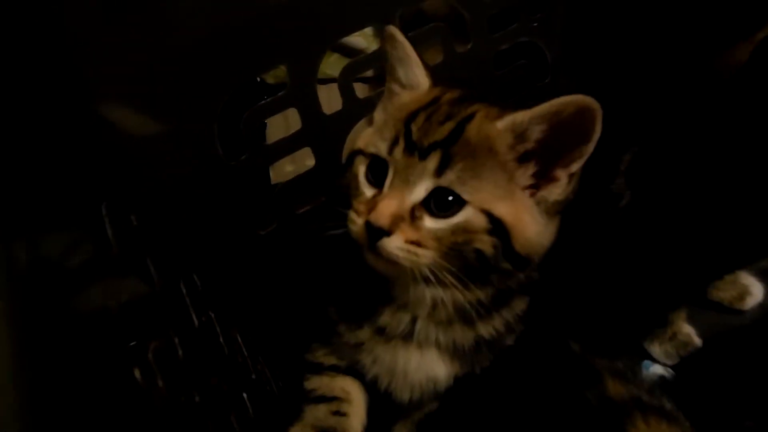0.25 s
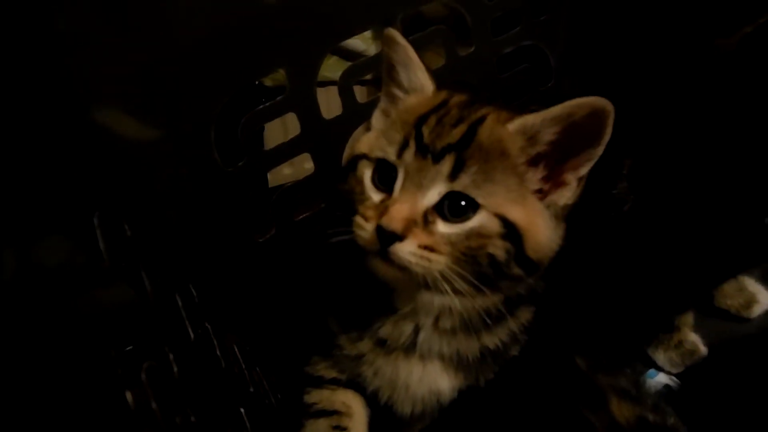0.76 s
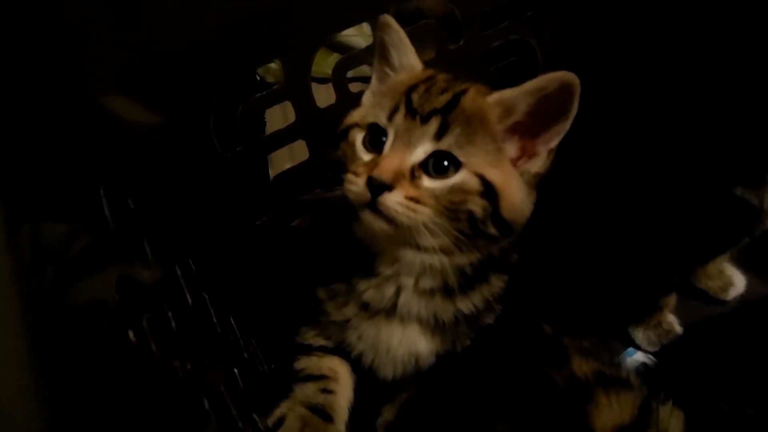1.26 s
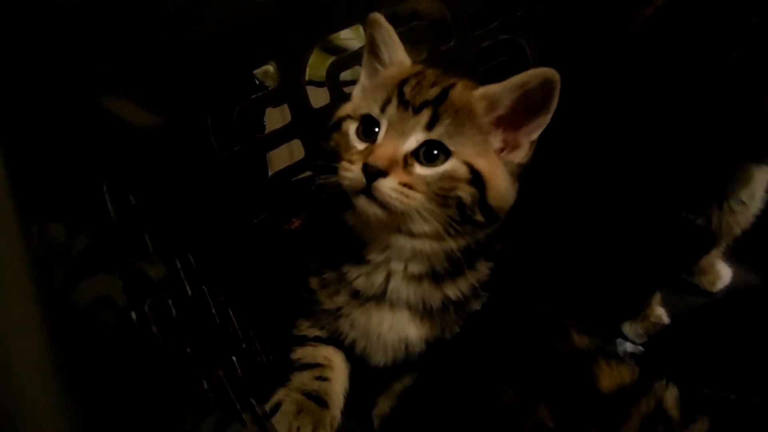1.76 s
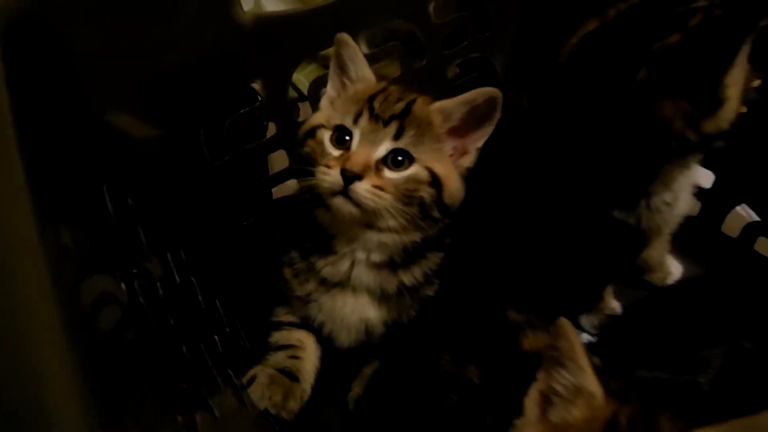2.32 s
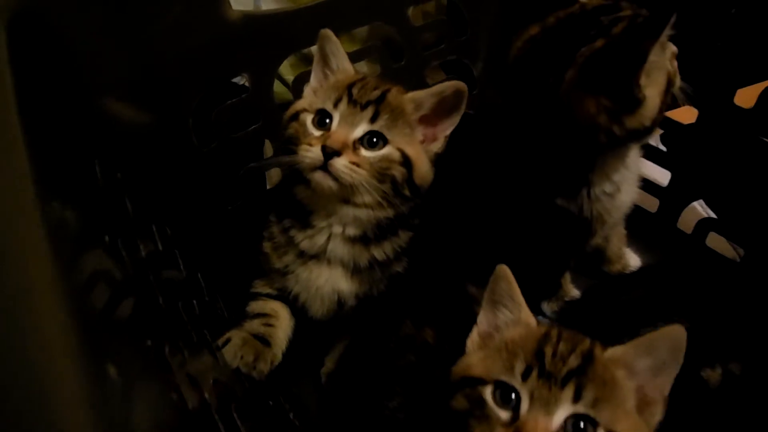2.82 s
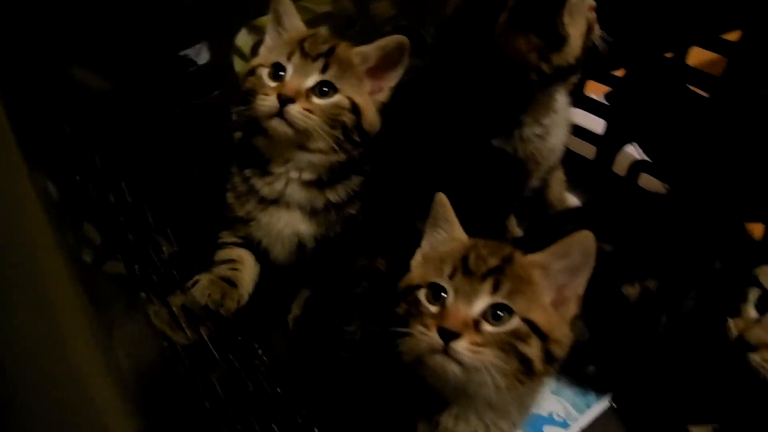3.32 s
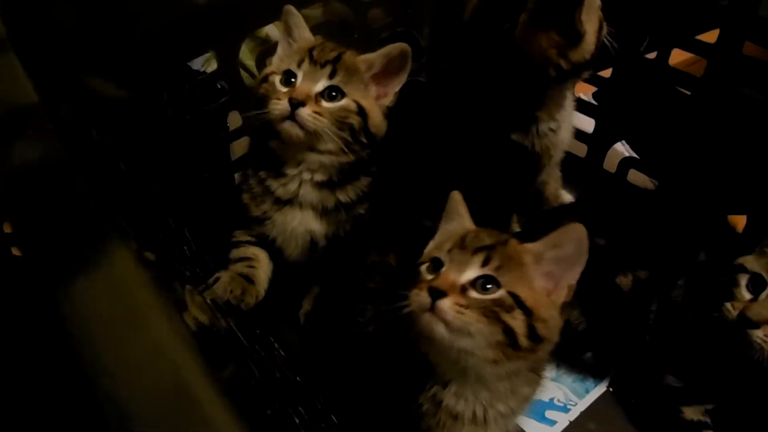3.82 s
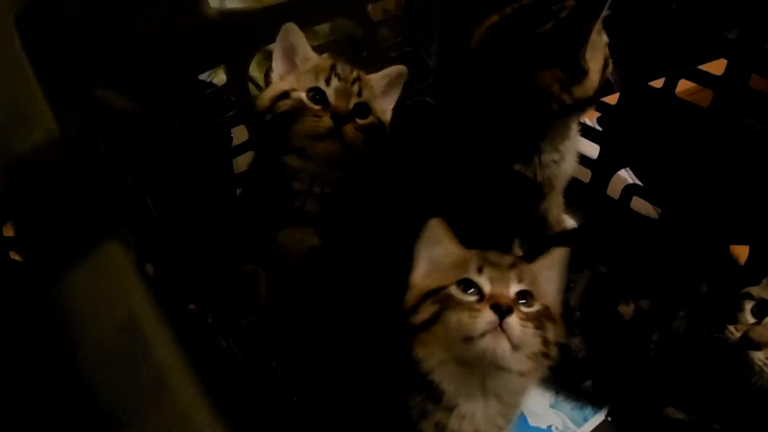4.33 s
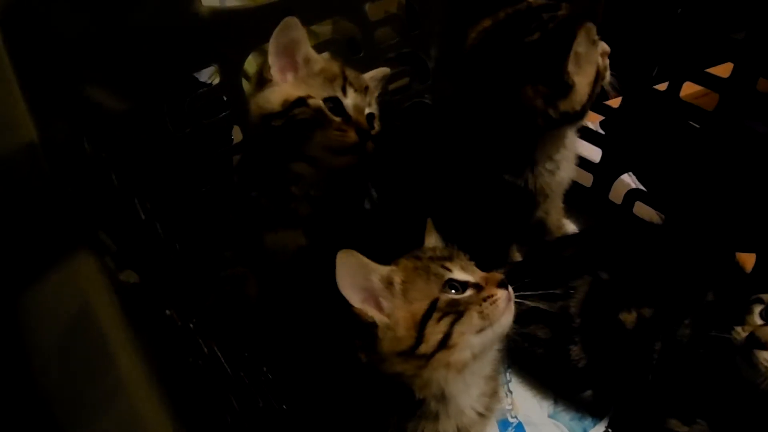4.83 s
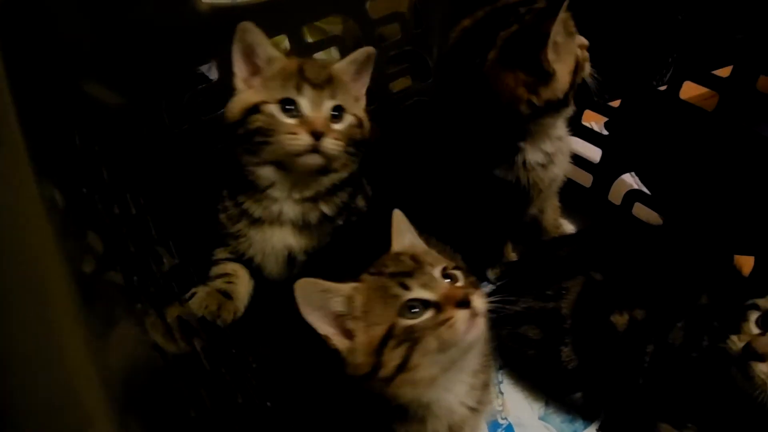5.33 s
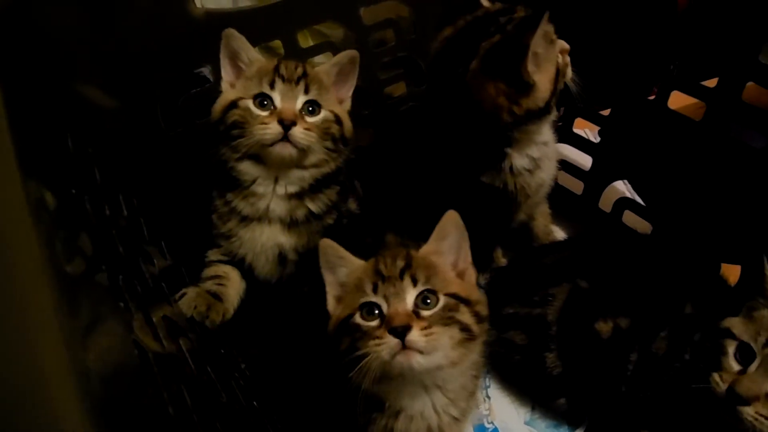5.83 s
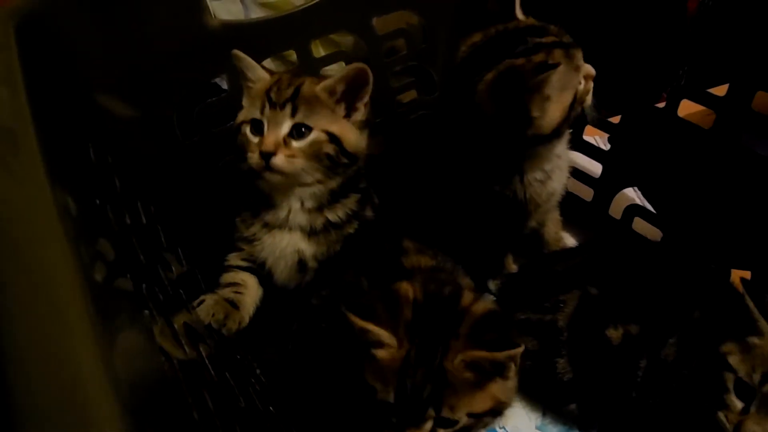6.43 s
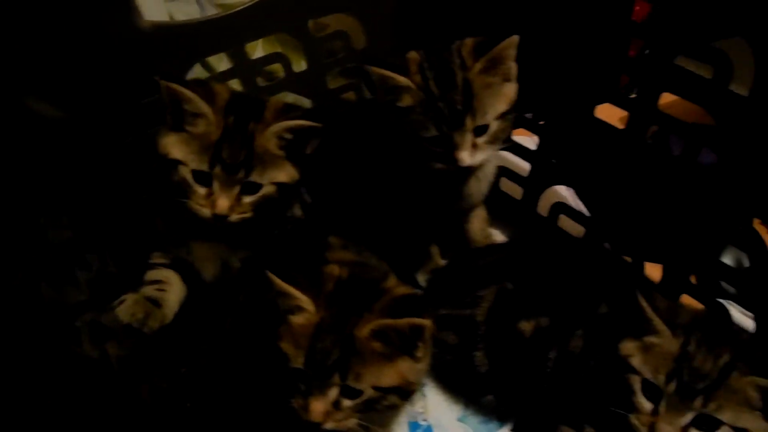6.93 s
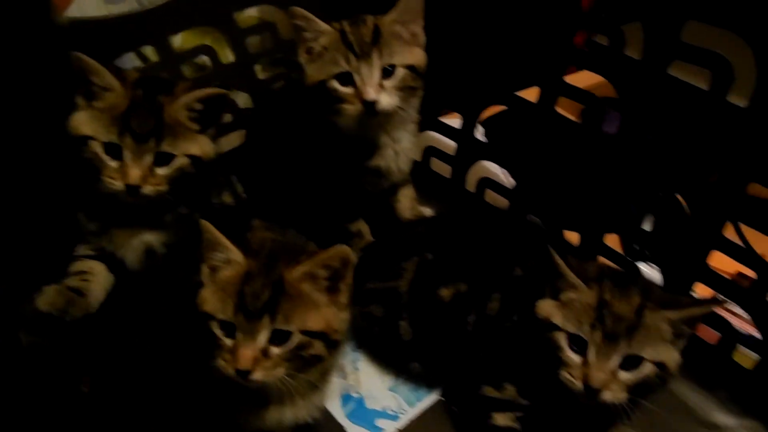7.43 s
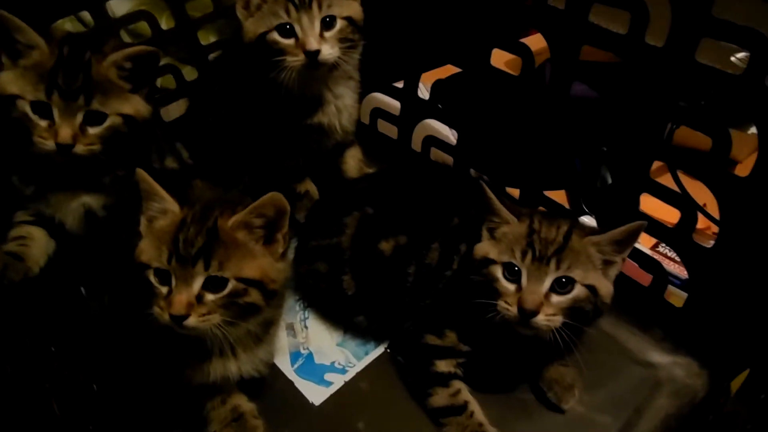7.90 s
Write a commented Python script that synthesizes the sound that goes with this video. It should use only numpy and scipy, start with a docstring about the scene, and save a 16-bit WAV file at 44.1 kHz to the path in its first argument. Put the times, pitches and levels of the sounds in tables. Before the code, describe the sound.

A quiet small room with faint low hum and soft hiss, heard close in stereo. Barely audible claw rubs begin at 0.1 s. From about 0.65 s kitten claws scrape and snap on a ribbed plastic basket: dry, gritty strokes of a few hundredths of a second, ending in bright clicks with a very brief ring. They come in irregular clusters, with a sharp snap near 2.0, strong rasping scratches at 2.6-2.8, smaller ticks from 3.0, and the hardest snaps at 3.76 and 3.91. Faint paw thuds lie under some. From 4 to 5.5 s it is almost silent. A short scratch burst comes at 5.6-5.85. Between 6.3 and 6.85 a run of dull, low knocks and soft rubs bumps the wall, strongest at 6.35. Quiet returns until a few lighter scratches and clicks at 7.8-8.15.

```python
"""Gritty scratches, sharp snaps with a brief ring, then late on a run of dull knocks, over faint hum and hiss.
Kittens scrabble in a plastic laundry basket in a quiet, small room, close to a stereo pair of ports.
Claws are stick-slip impulse trains and single slips, shaped by the spectrum of the plastic and ringing rib modes.
Knocks are softer slips with wall modes; paw thuds are damped sines; the room tone is shaped noise with two hum tones."""
import sys
import numpy as np
from scipy import signal
from scipy.fft import rfft, irfft
from scipy.io import wavfile
from scipy.ndimage import uniform_filter1d

SR = 44100
rng = np.random.default_rng(int(sys.argv[2]) if len(sys.argv) > 2 else 0)


def wav_record(signal):
    """Record a signal, one row per channel, as 16-bit PCM in the file named by sys.argv[1]."""
    frames = np.transpose(np.atleast_2d(signal))
    bounded = np.clip(frames, -1, 1)
    # unit amplitude maps onto the largest positive 16-bit level
    quanta = np.round(bounded * 32767).astype(np.int16)
    wavfile.write(sys.argv[1], SR, quanta)


N = 359856

# share of the wall flex at each pitch: (frequency [Hz], share)
FLEX_SHARE = [(1400, 1), (2500, 0)]
EDGE_HZ = 16000  # upper band limit
TAPS = 2048  # length of the contact forces and filters
HZ = np.fft.rfftfreq(TAPS, 1 / SR)
LEAD_S = .004  # a slip lets go this long after its buffer starts
RMS_1MS = np.sqrt(SR / 1000)  # turns energy 1 into rms 1 over 1 ms


def amp(db):
    """Amplitude ratio of a level in dB."""
    return 10 ** (np.asarray(db) / 20)


def unit(x):
    """Scales to rms 1."""
    return x / np.sqrt(np.mean(x ** 2) + 1e-20)


def read(points, hz):
    """Joins table rows by straight lines on a log-frequency axis."""
    f, value = np.transpose(points)
    return np.interp(np.log(hz + 1), np.log(f + 1), value)


def wander(count, size):
    """Smoothed noise of rms 1."""
    once = uniform_filter1d(rng.standard_normal(count), size)
    return unit(uniform_filter1d(once, size))


def add(mix, s, sound):
    """Adds a sound to the mix at time s, cut at the end of the mix."""
    part = mix[:, round(s * SR):][:, :sound.shape[1]]
    part += sound[:, :part.shape[1]]


def snaps(wet_db=-9.5, ring_db=-3.0, chatter=.18):
    """Claw tips flick off the ribs: a wall that gives also rings, and a long slip is sharp."""
    # claw letting go of a rib: (time [s], rms level over 1 ms [dB], slip length [s], give of the wall [dB])
    snap_events = [(.665, -36, 0.0012, 14), (.722, -27.5, 0.0012, 5), (0.858, -16, 0.00052, 7.5),
                   (.914, -11, 0.0012, -7), (1.103, -15.5, 0.00091, 11.5), (1.131, -13, 0.00058, 8),
                   (1.156, -19.5, 0.00093, -8), (1.194, -29.5, 0.0018, -1), (1.384, -26, 0.0006, 7),
                   (1.444, -13, 0.00068, 2.5), (1.525, -16, 0.001, 10.5), (1.586, -26.5, 0.0018, 12),
                   (1.631, -18.5, 0.0015, 14.5), (1.699, -22.5, 0.00041, 11), (1.854, -20, 0.00055, 12),
                   (1.9582, -14.5, .001, 3), (1.966, -14.5, 0.00031, -0.5), (1.984, -6, 0.00081, 4.5),
                   (1.998, -14, 0.001, -3), (2.059, -21, 0.0026, 19), (2.122, -17, 0.0022, 12),
                   (2.13, -17, 0.00025, 4.5), (2.1442, -13.5, 0.00065, 12), (2.287, -15.5, 0.0023, 11),
                   (2.344, -33, 0.0012, 13), (2.445, -34.5, 0.0011, 26), (2.611, -9, 0.0014, 15.5),
                   (2.649, -13, .0011, 8), (2.753, -9, 0.00089, 3.5), (2.779, -6, 0.0032, 2.5),
                   (2.920, -8.5, 0.0017, 2), (2.951, -12.5, 0.00089, 1.5), (3.024, -28, 0.0013, 18.5),
                   (3.055, -38.5, 0.0008, 19), (3.1315, -25.5, 0.0013, 10), (3.151, -15, .0014, 15.5),
                   (3.166, -18.5, 0.00032, 0), (3.178, -10.5, 0.00069, 1), (3.257, -24.5, 0.00082, 16.5),
                   (3.341, -18.5, 0.0017, 6), (3.377, -28.5, .0013, 13.5), (3.419, -35.5, 0.0044, 27),
                   (3.459, -19, 0.0023, 7), (3.472, -33, 0.0013, 7), (3.509, -14.5, 0.0029, 5),
                   (3.610, -22, .0012, 8.5), (3.625, -21, 0.0035, 12.5), (3.711, -12.5, 0.0004, -3),
                   (3.7606, 0.5, 0.0016, -3.5), (3.774, -7, 0.0015, 0.5), (3.880, -9, 0.0027, 4.5),
                   (3.910, -1.5, 0.0027, 3.5), (5.613, -18, 0.00081, 6), (5.697, -32.5, 0.0024, 18),
                   (5.765, -17, 0.0019, 6.5), (5.832, -6.5, 0.0019, 2.5), (7.787, -36, 0.0015, 20.5),
                   (7.926, -13, .0005, 0), (7.979, -14, .001, 8.5), (8.110, -17.5, 0.0026, 9.5),
                   (8.1382, -17, .0026, -8)]
    # relative contact spectrum: (frequency [Hz], density [dB])
    base = [(60, -28), (200, -26), (600, -18), (1200, -20), (2000, -12), (3100, -8.5), (4200, -6),
            (5700, -4.5), (7700, 6.5), (9300, 0.5), (11000, -7.5), (15500, -11.5)]
    usual_slip_s, sharp_db_per_octave, lumps_db = 0.00088, 4, 2
    out = np.zeros((2, N))
    for s, db, length_s, give_db in snap_events:
        spot_db, rib_hz = spot_at(s)
        sharp_db = spot_db + sharp_db_per_octave * np.log2(length_s / usual_slip_s)
        colour_db = claw_colour(base, give_db, ring_db + ring_of(give_db), sharp_db, rib_hz)
        # each blow favours some resonances of the plastic
        colour_db = colour_db + lumps_db * wander(len(HZ), size=36)
        direct_and_wet = radiate(slip(length_s, chatter), colour_db, *place(s), wet_db)
        add(out, s - LEAD_S, amp(db) * RMS_1MS * rib_ring(direct_and_wet))
    return out


def scrapes(strokes, swell_db, flex_db, ring_db, sharp_db, wet_db, slips_per_s, uneven_db):
    """Claws drag along the wall in gritty strokes; the lighter the stroke, the more wall and rib sound."""
    # relative contact spectrum: (frequency [Hz], density [dB])
    base = [(60, -22), (250, -24), (700, -17), (1300, -20), (2100, -13), (3050, -8.5), (4100, -5.5),
            (5700, -4.5), (7600, 6.5), (9300, -1), (11500, -1.5), (15500, -13)]
    usual_stroke_db, give_per_db = -39, -0.1145
    out = np.zeros((2, N))
    for start_s, length_s, db in strokes:
        force, size = drag(length_s, db, swell_db, slips_per_s, uneven_db)
        spot_db, rib_hz = spot_at(start_s)
        give_db = give_per_db * (db - usual_stroke_db)
        colour_db = claw_colour(base, flex_db + give_db, ring_db + ring_of(give_db),
                                sharp_db + spot_db, rib_hz, rib_db=7.0)
        sound = rib_ring(radiate(force, colour_db, *place(start_s), wet_db))
        add(out, start_s, size * sound)
    return out


def slip(length_s, chatter, lead_in=0.289, ride_s=0.00021):
    """The contact rides up, lets go at once, and dies in a chatter of tiny slips."""
    t = np.arange(TAPS) / SR - LEAD_S
    rise = lead_in * np.exp(-abs(t) / ride_s)
    decay = np.exp(-abs(t) / max(length_s, 1e-4))
    uneven = rng.standard_normal(TAPS) * amp(8.2 * rng.standard_normal(TAPS))
    force = chatter * uneven * np.where(t < 0, rise, decay)
    force[round(LEAD_S * SR)] += 1
    z = rfft(force)
    return irfft(z / np.sqrt(abs(z) + 1e-9))  # flattened: so brief a push excites all pitches nearly alike


def drag(length_s, db, swell_db, slips_per_s, uneven_db=2.0, judder_db=2., rise_s=0.0035, release_s=0.0099):
    """Random stick-slip on the grain of the plastic under changing pressure; returns the force and its size."""
    t = np.arange(SR // 4) / SR  # strokes end here at the latest
    length_s = max(length_s, .01)
    pressure = amp(db + swell_db * (np.minimum(t / length_s, 1) - .5))
    pressure *= np.minimum(t / rise_s, 1) * np.exp(-np.maximum(t - length_s, 0) / release_s)
    slips = (rng.random(len(t)) < slips_per_s / SR) * rng.choice([-1, 1], len(t))
    scatter_db = uneven_db * np.clip(rng.standard_normal(len(t)), -2, 2.7)
    size = amp(scatter_db + judder_db * wander(len(t), size=110))
    return slips * size * pressure, np.linalg.norm(pressure)


def spot_at(s):
    """Sharpness [dB] and rib pitch [Hz] under the claw; the pitch scatters from contact to contact."""
    # spot that the paw works on: (time [s], rib pitch [Hz], sharpness [dB])
    spots = [(.72, 2090, -2.5), (.86, 3000, 0.5), (1.65, 2930, -4), (2.1, 3020, -3), (2.68, 3070, 2),
             (2.78, 1560, -0.5), (3.2, 1920, 3), (3.55, 2010, 0.5), (3.77, 2270, 2.5), (3.9, 2956, 2.5),
             (5.62, 3270, -4), (5.82, 1960, 4), (7.95, 3480, -1), (8.11, 1480, 3)]
    times, rib_hz, sharp_db = np.transpose(spots)
    scatter = np.exp(0.066 * rng.standard_normal())
    return np.interp(s, times, sharp_db), np.interp(s, times, rib_hz) * scatter


def place(s):
    """Left-right balance [dB] and lead of the left port [s] for the paw at work at this moment."""
    # paw position: (time [s], left-right balance [dB], lead of the left port [s])
    positions = [(.9, 1, 0.000077), (1.2, 0.5, 0.000061), (1.6, -0.5, 0.000043), (2.6, -1, 0.00005),
                 (3.0, -1.5, 0.000031), (3.8, -2, 2e-5), (5.702, -1.5, 0.000025), (7.93, -1.5, 1e-6)]
    times, balance_db, lead_s = np.transpose(positions)
    return np.interp(s, times, balance_db), np.interp(s, times, lead_s)


def claw_colour(base, flex_db, ring_db, sharp_db, rib_hz, rib_db=8.0):
    """Spectrum [dB] of one spot on the basket, with the broad resonance of the rib under the claw."""
    # share of rib ring at each pitch: (frequency [Hz], share)
    ring_share = [(1400, 0), (2500, 1), (4800, 1), (6800, 0)]
    # share of sharpness at each pitch: (frequency [Hz], share)
    sharp_share = [(9000, 0), (11500, 1)]
    rib = rib_db / (1 + ((HZ / rib_hz - 1) / .12) ** 2)
    wall = flex_db * read(FLEX_SHARE, HZ) + ring_db * read(ring_share, HZ)
    return read(base, HZ) + rib + wall + sharp_db * read(sharp_share, HZ)


def ring_of(give_db):
    """A wall that gives also shakes its ribs, up to a limit; returns dB."""
    return min(0.73 * give_db, 12)


def rib_ring(x):
    """One contact with the rib modes that it wakes, mixed at random for each contact."""
    # modes of the plastic ribs before the mix: (frequency [Hz], level [dB], t60 [s])
    rib_modes = [(1874, -51, 0.043), (2398, -40.5, 0.031), (3010, -58, 0.044), (3124, -49.5, 0.045),
                 (6500, -66, .05), (7200, -83.5, 0.09), (7900, -65, .07), (9480, -39.5, 0.048)]
    mix_db = 3 * np.clip(rng.standard_normal(len(rib_modes)), -2, 1.5)
    mixed = [(hz, db + extra_db, t60_s) for (hz, db, t60_s), extra_db in zip(rib_modes, mix_db)]
    return ringing(x, mixed)


def ringing(x, modes):
    """Lightly damped modes of the plastic sing on after each contact."""
    t = np.arange(SR // 6) / SR
    ring = np.zeros(len(t))
    for hz, db, t60_s in modes:
        ring += amp(db - 60 * t / t60_s) * np.sin(2 * np.pi * (hz * t + rng.random()))
    return x + signal.fftconvolve(x, ring[None], axes=1)[:, :x.shape[1]]


def causal(db):
    """Minimum-phase impulse response of a spectrum in dB."""
    log_gain = np.log(amp(np.concatenate([db, db[-2:0:-1]])))
    return np.fft.ifft(np.exp(np.conj(signal.hilbert(log_gain)))).real


def radiate(force, colour_db, pan_db, lead_s, wet_db):
    """A force sounds through the plastic to two ports, direct (mean energy 1) and by reflection."""
    # difference in port colour: (frequency [Hz], left-right [dB])
    port_balance = [(300, -1), (2000, 0), (4000, 0), (5500, 1), (7500, -1.5), (10000, 0), (12500, 2),
                    (15000, 5)]
    # likeness of the direct sound at the ports: (frequency [Hz], coherence)
    port_likeness = [(300, 1), (1500, 0.64), (4000, 0.7), (9000, 0.6), (15000, 0.23)]
    spot_db = 1.2 * wander(len(HZ), size=22)
    likeness = np.clip(read(port_likeness, HZ), 0, 1)
    phase_spread = np.sqrt(1 - likeness ** 2) * wander(len(HZ), size=40)
    side_db = (read(port_balance, HZ) + pan_db) / 2
    ports = np.array([causal(colour_db + spot_db + side_db), causal(colour_db + spot_db - side_db)])
    source = signal.fftconvolve(force[None], ports[:, :TAPS // 2], axes=1)
    source /= np.sqrt((source ** 2).sum() / 2)
    # the right port hears it a little later, with its phase bent
    count = source.shape[1]
    lag = np.interp(np.fft.rfftfreq(count, 1 / SR), HZ, 2 * np.pi * HZ * lead_s + phase_spread)
    late_right = irfft(rfft(source[1]) * np.exp(-1j * lag), count)
    out = signal.fftconvolve(source, amp(wet_db) * surroundings(), axes=1)
    add(out, 0, np.array([source[0], late_right]))
    return out


def surroundings(basket_db=1.0, room_db=-5.5, build_s=0.0015):
    """Basket echoes and a short room tail, each band dying at its own speed; levels before the wet gain."""
    # likeness of the tail at the ports: (frequency [Hz], coherence)
    room_likeness = [(300, 0.99), (1000, 0.87), (2500, 0.19), (5000, 0.28)]
    # decay of the room: (frequency [Hz], t60 [s])
    room_t60 = [(200, 0.11), (1000, 0.25), (3000, 0.25), (8000, 0.2), (15000, 0.19)]
    noise = irfft(diffuse(room_likeness, SR // 4))
    hz, t, z = signal.stft(noise, SR, nperseg=256)
    decay = amp(-60 * t / read(room_t60, hz)[:, None])
    tail = signal.istft(z * decay, SR, nperseg=256)[1]
    tail *= 1 - np.exp(-(np.arange(tail.shape[1]) / SR / build_s) ** 2)
    tail *= amp(room_db) / np.linalg.norm(tail[0])
    add(tail, 0, amp(basket_db) * basket_echoes())
    return tail


def basket_echoes(first_s=.0016, fade_s=0.0019, count=50):
    """The near walls of the basket throw back a cluster of quick reflections, energy 1 per port."""
    taps = np.zeros((2, TAPS))
    delay_s = np.clip(first_s + 0.026 * rng.random((2, count)), 0, .04)
    echoes = rng.choice([-1, 1], delay_s.shape) * np.exp(-delay_s / fade_s)
    np.put_along_axis(taps, (delay_s * SR).astype(int), echoes, 1)
    return taps / np.linalg.norm(taps, axis=1, keepdims=True)


def diffuse(likeness, count):
    """Spectra of two noises whose coherence follows a table over frequency."""
    a, b = rfft(rng.standard_normal((2, count)))
    same = np.clip(read(likeness, np.fft.rfftfreq(count, 1 / SR)), -1, 1)
    return np.array([a, same * a + np.sqrt(1 - same ** 2) * b])


def knocks(pan_db=-2.5, lead_s=4e-5, wet_db=-9.5):
    """Soft bumps and rubs on the whole wall: low, broad and short."""
    # dull knock: (time [s], rms level over 1 ms [dB], length [s], hardness [dB])
    knock_events = [(5.333, -50.5, 0.0021, -16), (6.012, -45, 0.0054, -15), (6.298, -29, 0.0078, 10),
                    (6.321, -30.5, 0.0031, 7), (6.3523, -13.5, 0.0016, 3), (6.371, -23, 0.00099, -2.5),
                    (6.396, -33.5, 0.0014, -3), (6.434, -34, 0.012, -4), (6.465, -19, .0013, -0.5),
                    (6.475, -22, 0.0013, 1), (6.5634, -23.5, 0.0032, 4.5), (6.625, -31.5, 0.0052, -7),
                    (6.644, -32, .002, -6), (6.668, -33.5, 0.0056, 11), (6.679, -30.5, 0.004, -2),
                    (6.801, -31.5, 0.0029, -2), (6.814, -28, 0.018, -3), (6.847, -35, 0.0025, -5)]
    # soft rubbing after a knock: (start [s], length [s], level [dB])
    rubs = [(6.356, 0.019, -47), (6.475, 0.018, -40.5), (6.803, 0.053, -39.5)]
    # relative contact spectrum: (frequency [Hz], density [dB])
    knock_colour = [(50, -24), (140, -9.5), (400, 2.5), (750, 0.5), (1050, 2.5), (1700, -3.5), (2000, -4),
                    (2900, -7), (3900, -15), (4800, -12), (6000, -22), (9000, -14.5), (15000, -30)]
    base_db = read(knock_colour, HZ)
    out = np.zeros((2, N))
    for s, db, length_s, hard_db in knock_events:
        lumps_db = 1 * wander(len(HZ), size=7)
        colour_db = base_db + hard_db * (1 - read(FLEX_SHARE, HZ)) + lumps_db
        sound = radiate(slip(length_s, chatter=0.64), colour_db, pan_db, lead_s, wet_db)
        add(out, s - LEAD_S, amp(db) * RMS_1MS * sound)
    for start_s, length_s, db in rubs:
        # a rub dies down as it goes
        force, size = drag(length_s, db, swell_db=-7.5, slips_per_s=600, uneven_db=1.5)
        add(out, start_s, size * radiate(force, base_db, pan_db, lead_s, wet_db))
    return out


def thuds(cycles=0.77):
    """The basket floor gives under a landing paw pad: a sine that dies within a cycle or two."""
    # paw landing: (time [s], rms level over 1 ms [dB], pitch [Hz])
    landings = [(1.527, -40, 191), (1.611, -34, 53.4), (2.04, -45, 54.4), (2.612, -30, 294),
                (2.64, -39, 59.4), (6.462, -37, 202), (6.808, -42, 206)]
    out, t = np.zeros((2, N)), np.arange(SR // 6) / SR
    for s, db, hz in landings:
        swing = np.sin(2 * np.pi * hz * t) * (1 - np.exp(-4 * hz * t)) * np.exp(-hz * t / cycles)
        add(out, s, amp(db) * RMS_1MS * swing[None] / np.linalg.norm(swing))
    return out


def room_tone(quiet_db=-59, hum_waver_rad=0.1):
    """Steady rumble and hiss as shaped noise, with an appliance hum whose phase wavers."""
    # relative room tone spectrum: (frequency [Hz], density [dB])
    quiet = [(12, -45), (20, 14), (53, -7.5), (68, -13), (83, -6.5), (101, -6.5), (127, -13.5), (177, -14),
             (210, -15), (248, -15.5), (434, -19.5), (499, -19), (2530, -27), (8410, -28), (16000, -29)]
    # likeness of the room tone at the ports: (frequency [Hz], coherence)
    quiet_likeness = [(60, 0.94), (130, 0.61), (290, 0.37), (640, 0.24), (1400, 0.12), (3000, 0)]
    # hum tones: (frequency [Hz], rms level [dB])
    hum_tones = [(43, -70), (100, -65)]
    hz, t = np.fft.rfftfreq(N, 1 / SR), np.arange(N) / SR
    z = diffuse(quiet_likeness, N) * amp(read(quiet, hz))
    heard = (hz > 150) & (hz < EDGE_HZ)  # the band that quiet_db refers to
    hiss = amp(quiet_db) * irfft(z, N) / np.std(irfft(z * heard, N))
    hum = np.zeros(N)
    for f, db in hum_tones:
        phase = 2 * np.pi * f * t + hum_waver_rad * wander(N, size=6000)
        hum += amp(db) * np.sqrt(2) * np.sin(phase)
    return hiss + hum


def scene():
    """Claws wake the ribs, knocks wake the wall; paw thuds and the room lie beneath."""
    # claw pulling ever harder until it lets go: (start [s], length [s], level [dB])
    pull_strokes = [(.12, 0.056, -61.5), (.25, 0.052, -61), (.4, .06, -62), (.642, .06, -51),
                    (.713, .009, -41.5), (.89, 0.025, -30.5), (1.138, 0.014, -34), (1.279, .026, -54.5),
                    (1.4, .034, -47), (1.501, 0.032, -39.5), (1.591, 0.026, -37.5), (1.66, 0.045, -40.5),
                    (1.76, 0.037, -45.5), (1.816, 0.038, -47), (2.033, 0.03, -41), (2.11, 0.028, -37.5),
                    (2.207, 0.027, -42), (2.255, 0.027, -41.5), (2.403, 0.041, -37), (2.486, 0.051, -36.5),
                    (2.567, 0.034, -28.5), (2.928, 0.015, -28.5), (3.119, .013, -51), (3.151, 0.0065, -34),
                    (3.399, 0.018, -46.5), (3.494, 0.011, -39.5), (3.607, .022, -39), (3.68, 0.027, -36.5),
                    (5.573, 0.036, -49.5), (5.682, 0.03, -51), (5.758, .008, -43), (7.798, 0.014, -45),
                    (7.949, 0.019, -40), (8.11, 0.035, -37)]
    # freed claw skidding on and losing its grip: (start [s], length [s], level [dB])
    skid_strokes = [(.86, 0.0089, -51), (.917, 0.013, -27), (1.168, 0.024, -46), (1.448, 0.035, -33.5),
                    (1.629, .023, -28), (1.97, .05, -31), (2.287, 0.022, -36.5), (2.359, 0.037, -36.5),
                    (2.61, 0.034, -26), (2.658, 0.047, -17.5), (2.754, 0.0087, -17), (2.78, 0.01, -24.5),
                    (2.95, 0.028, -28), (2.97, 0.11, -44.5), (3.766, 0.045, -37), (3.913, 0.034, -33.5),
                    (4.2, 0.29, -69.5), (5.626, 0.037, -48), (5.836, 0.048, -39)]
    # low modes that the knocks wake: (frequency [Hz], level [dB], t60 [s])
    wall_modes = [(211.4, -52.5, 0.16), (380, -44, 0.092), (698, -47.5, 0.12), (856, -46.5, 0.067),
                  (1030, -50, 0.052), (1250, -55.5, 0.098), (1736, -37, 0.044)]
    pulls = scrapes(pull_strokes, swell_db=10, flex_db=2.0, ring_db=2.5, sharp_db=1.0,
                    wet_db=-6.5, slips_per_s=2200, uneven_db=-1.5)
    skids = scrapes(skid_strokes, swell_db=-10.5, flex_db=2.0, ring_db=3., sharp_db=1.0,
                    wet_db=-13.0, slips_per_s=2600, uneven_db=4.0)
    return snaps() + pulls + skids + ringing(knocks(), wall_modes) + thuds() + room_tone()


def record(dry):
    """Cuts rumble below 35 Hz and softly limits the tallest peaks; then the band limit."""
    ceiling = .8
    rumble_cut = signal.butter(6, 35, "highpass", fs=SR, output="sos")
    lean = signal.sosfilt(rumble_cut, dry)
    rounded = ceiling * np.tanh(lean / ceiling)
    band_limit = signal.firwin(255, EDGE_HZ, window=("kaiser", 9), fs=SR)
    return signal.oaconvolve(rounded, band_limit[None], "same")


dry = scene()
out = record(dry)
wav_record(out)
```